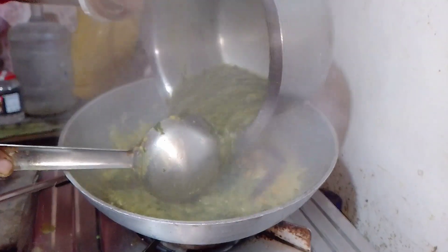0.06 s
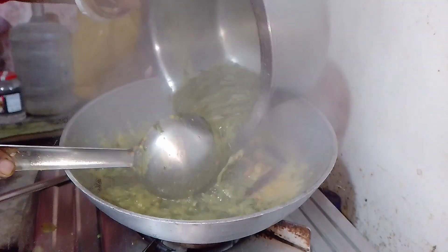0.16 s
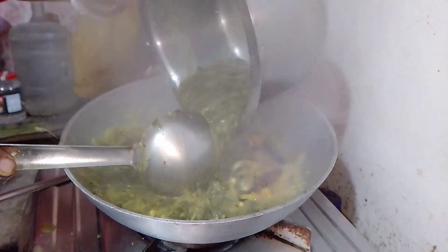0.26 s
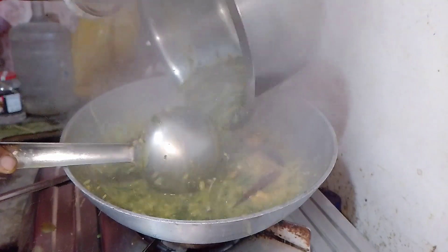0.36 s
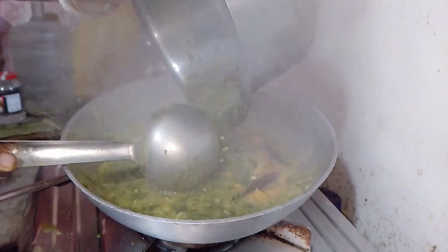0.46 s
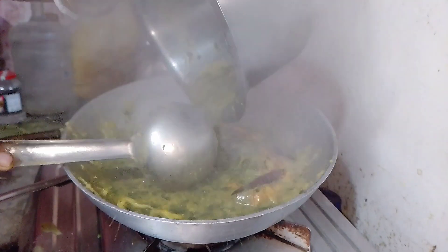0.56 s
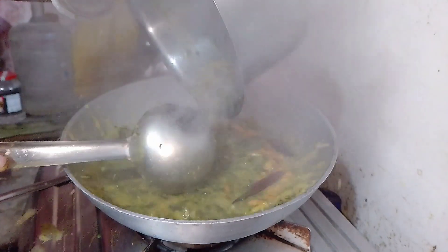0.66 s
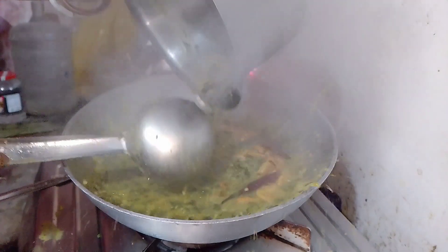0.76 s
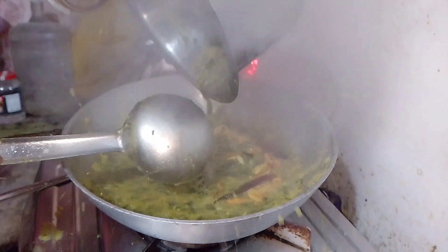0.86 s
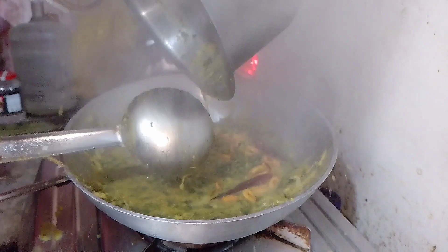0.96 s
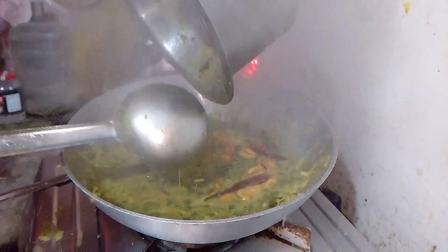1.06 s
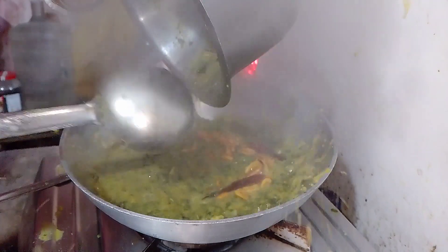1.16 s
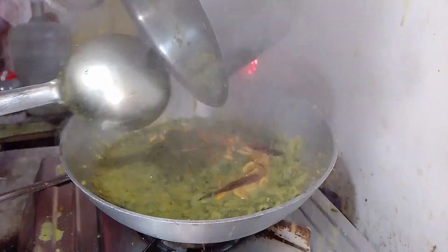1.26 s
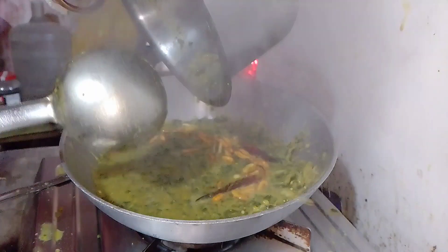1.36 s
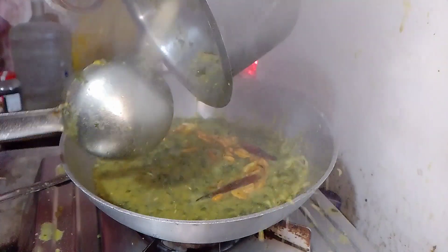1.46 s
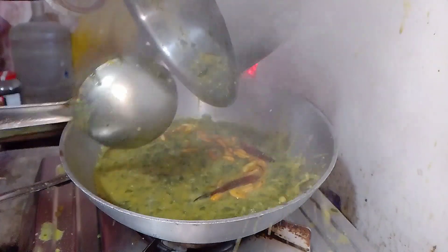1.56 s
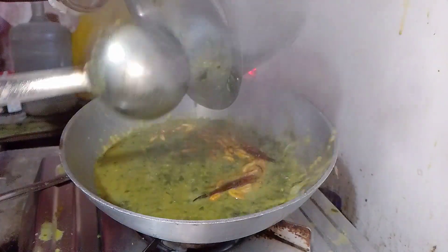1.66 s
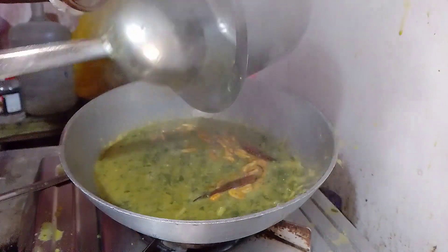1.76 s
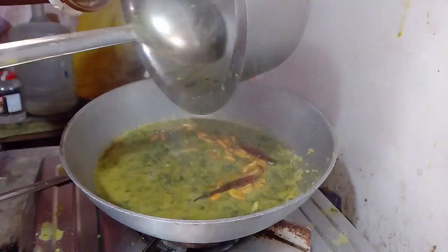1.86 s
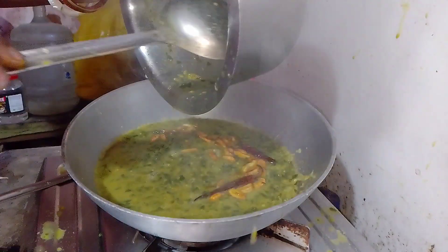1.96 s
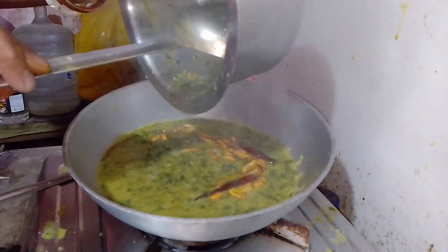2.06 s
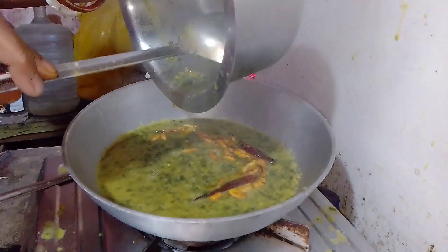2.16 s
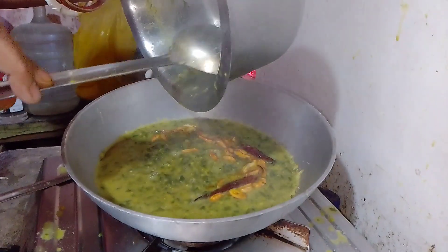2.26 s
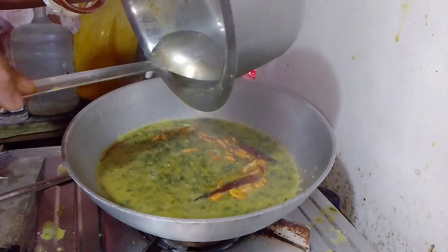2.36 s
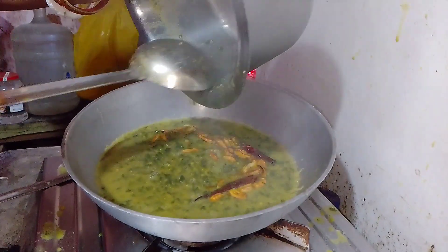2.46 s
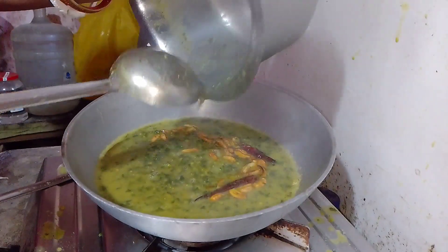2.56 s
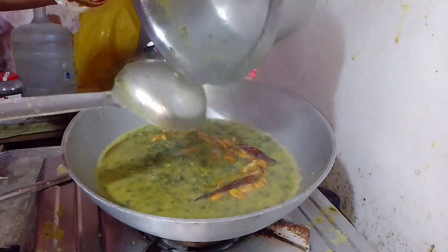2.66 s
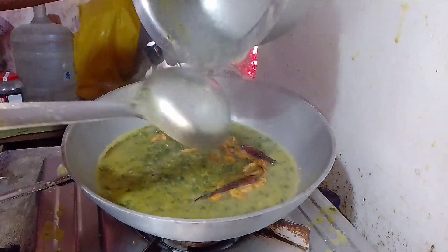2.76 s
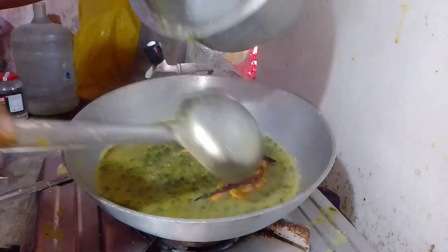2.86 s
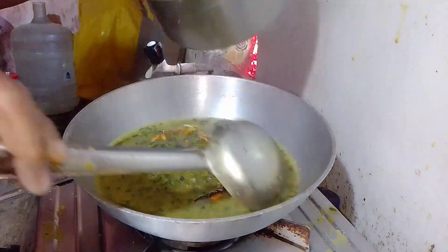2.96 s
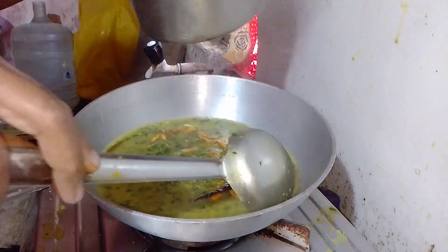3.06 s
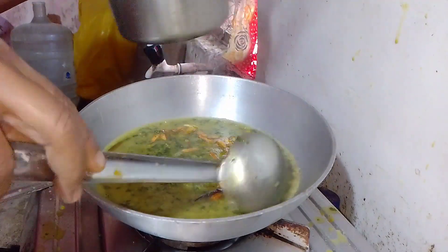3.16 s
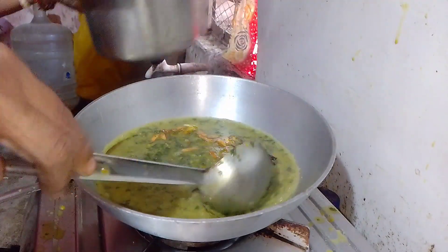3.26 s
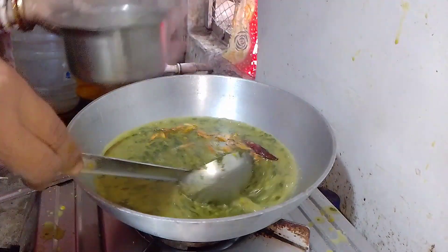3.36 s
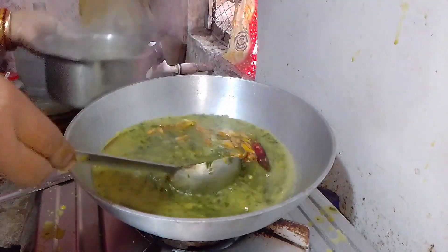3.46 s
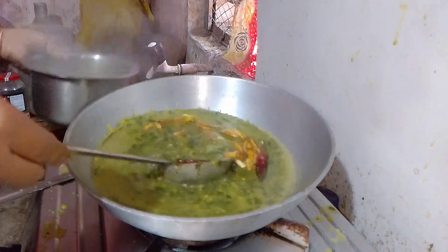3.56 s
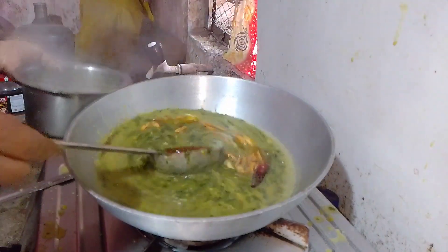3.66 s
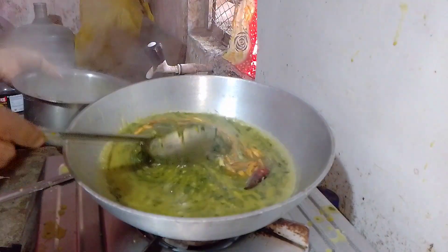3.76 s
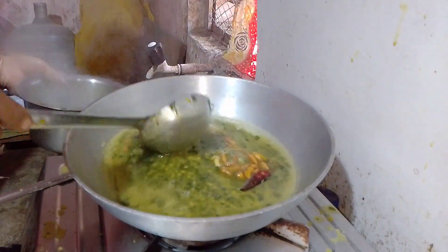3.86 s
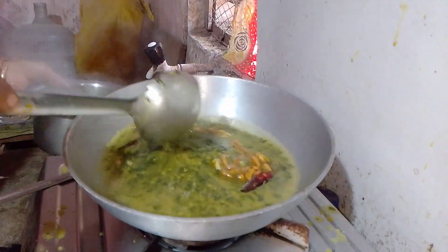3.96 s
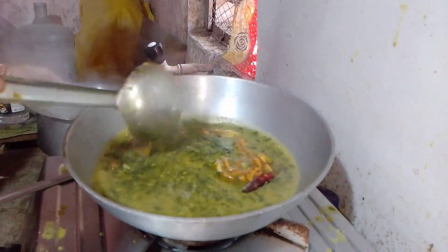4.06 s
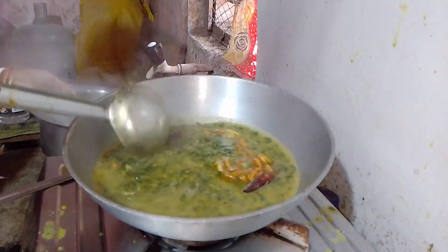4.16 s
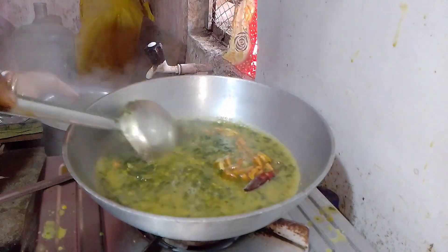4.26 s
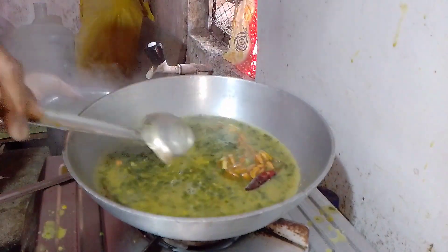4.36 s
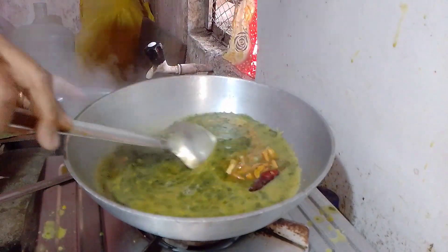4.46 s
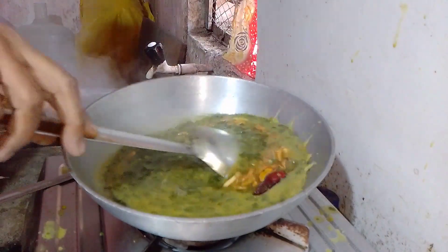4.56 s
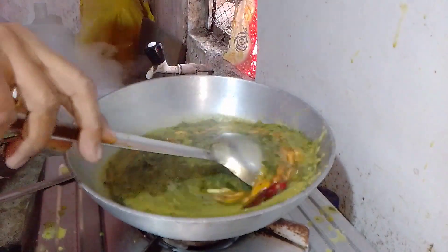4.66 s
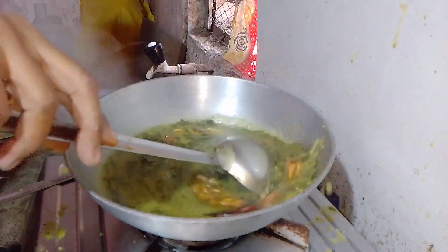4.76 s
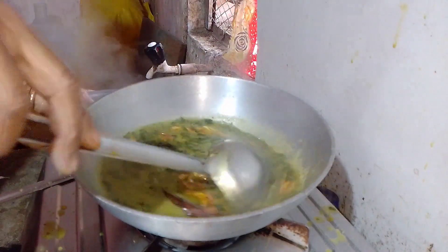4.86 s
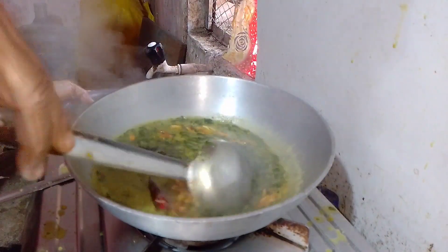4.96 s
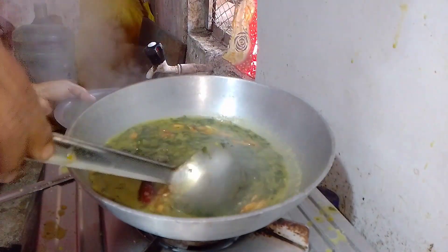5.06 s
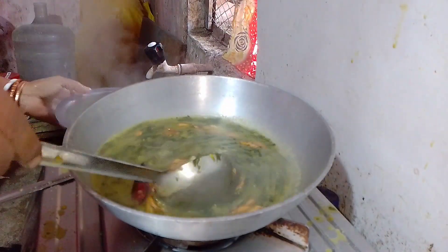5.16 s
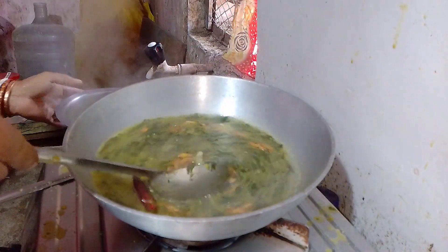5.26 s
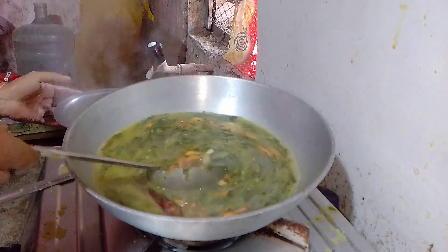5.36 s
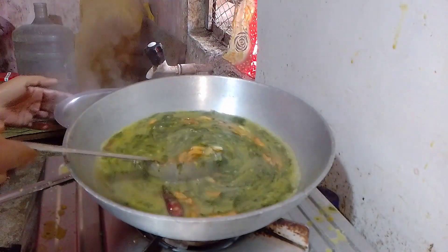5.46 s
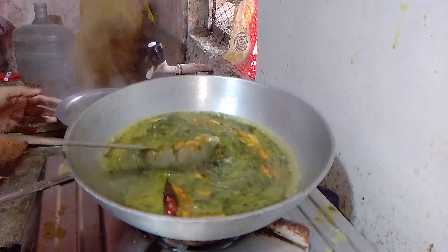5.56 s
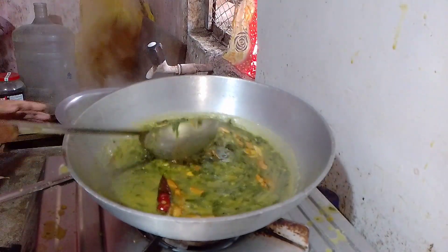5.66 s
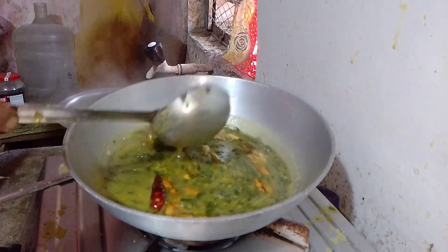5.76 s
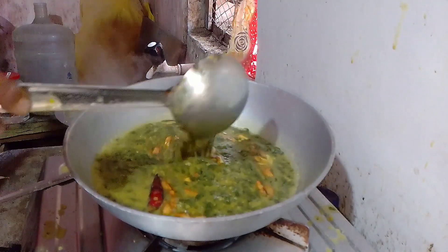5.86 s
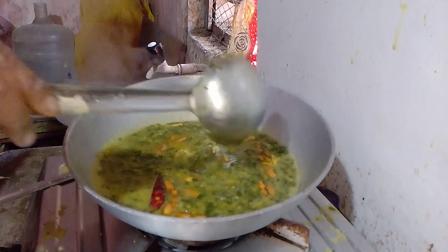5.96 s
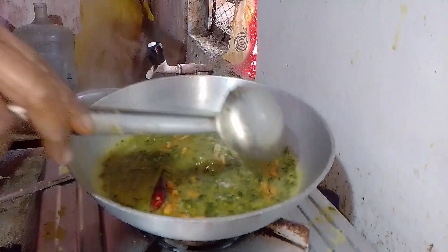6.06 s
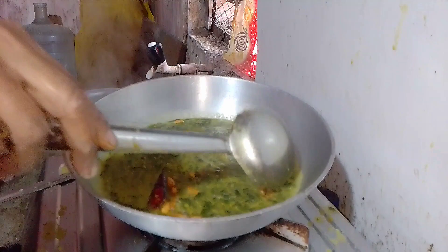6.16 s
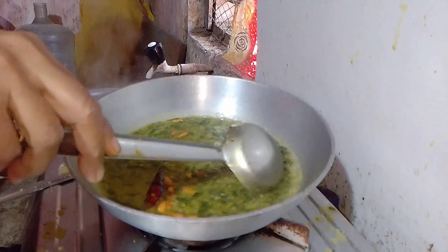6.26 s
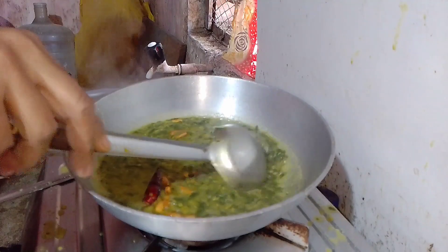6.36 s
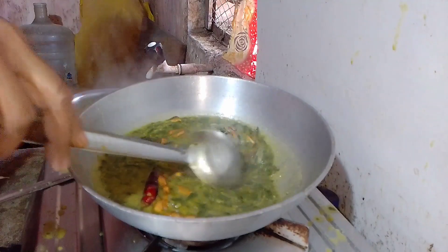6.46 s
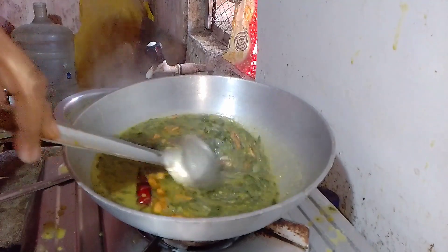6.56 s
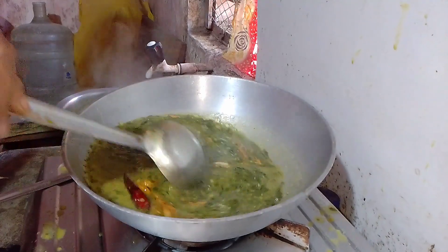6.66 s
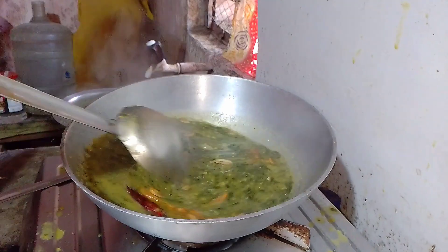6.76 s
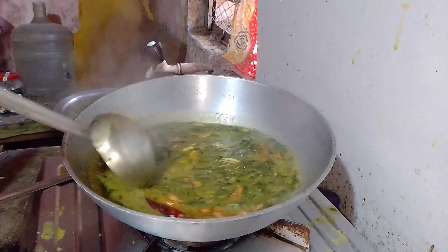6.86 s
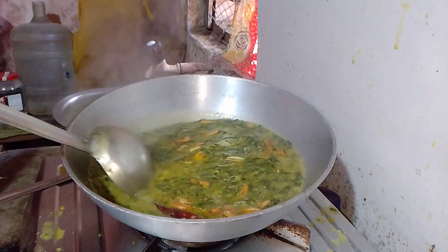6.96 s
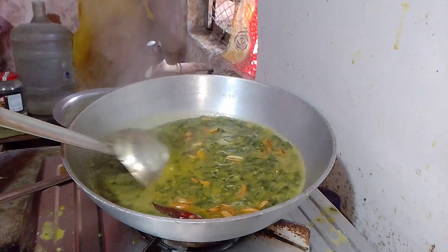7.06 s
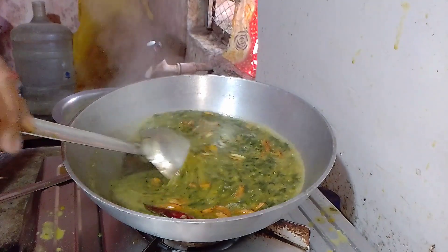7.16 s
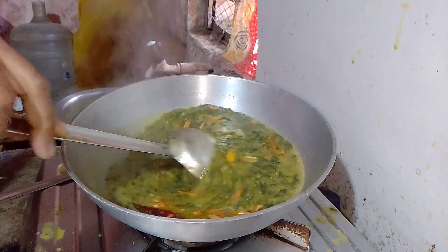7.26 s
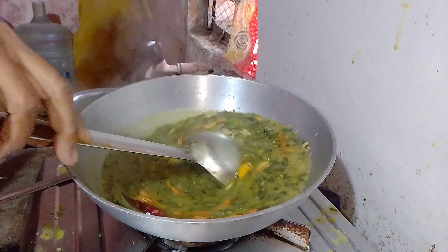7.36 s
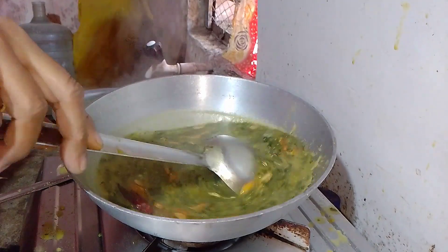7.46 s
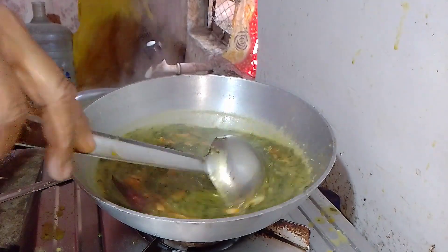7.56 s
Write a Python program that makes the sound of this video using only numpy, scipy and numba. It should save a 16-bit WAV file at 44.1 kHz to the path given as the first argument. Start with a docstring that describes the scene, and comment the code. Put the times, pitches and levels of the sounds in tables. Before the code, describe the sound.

It opens on a loud sizzle and a low sputtering roar as puree lands in hot oil in a metal wok, heard close up in a small kitchen. The roar is gone by about 2 seconds, while the hiss fades steadily to a fine simmer with tiny spattering ticks. A steel ladle rasps briefly near 2.1 seconds, clanks against a pot at 2.4 and scrapes it with a squeal. At 3.1 seconds it strikes the wok with one clear ringing note, then scrapes, groans and sloshes through the thick liquid until about 3.8. A short squeak and several dull knocks come between 4.3 and 5 seconds, with another slosh. The ladle judders against the metal from 5 to 5.5 seconds, and more faintly near 6.3 and 7.3. From about 3.5 seconds to the end, the hiss swells and sinks with each stirring stroke.

```python
"""A small kitchen, one microphone close to a metal wok. Green puree is poured into hot spiced oil:
it lands with a roar, and bursting steam bubbles make a loud sizzle that dies down as the pan cools.
A steel ladle knocks and scrapes the emptied pot, clinks on the wok and stirs, groaning as it sticks
and slips; each stroke washes liquid up the hot wall and the hiss flares again."""
import sys
import numpy as np
from scipy import signal
from scipy.fft import rfft, irfft
from scipy.io import wavfile
from numba import njit

SR = 44100
rng = np.random.default_rng(int(sys.argv[2]) if len(sys.argv) > 2 else 0)


def put_to_file(sound):
    """Save the sound as 16-bit audio at rate SR, in the file named by the first command-line argument."""
    columns = np.atleast_2d(sound).T  # one column per channel
    safe = np.clip(columns, -1, 1)
    whole_steps = np.round(safe * 32767)
    wavfile.write(sys.argv[1], SR, whole_steps.astype(np.int16))


N = 335601
T = np.arange(N) / SR
FREQS = np.arange(N // 2 + 1) * SR / N
POUR_END_S = 0.57

# spectrum of bubbles bursting in hot oil: (frequency [Hz], relative level [dB])
HISS_SPECTRUM = [(700, -36.5), (1000, -19), (1270, -6), (1430, -9), (1750, -3), (2500, -2), (4200, -4),
                 (5200, -12), (6200, -12), (7300, -16.5), (9300, -12), (11000, -21.5), (12800, -28),
                 (15200, -18.5)]


def undb(db):
    """Decibels to gain."""
    return 10 ** (np.asarray(db) / 20)


def together(*levels_db):
    """Level in dB of unrelated sounds heard at once."""
    return 10 * np.log10(sum(undb(db) ** 2 for db in levels_db))


def unit(x):
    """Scale to rms 1."""
    return x / np.sqrt(np.mean(x ** 2) + 1e-20)


def shape(x, gain):
    """Filter by one gain per frequency."""
    return irfft(rfft(x) * gain, N)


def band_unit(x, low_hz, high_hz):
    """Scale so that the given band has rms 1."""
    return x / np.std(shape(x, (FREQS > low_hz) & (FREQS < high_hz)))


def colour(points):
    """Causal response through (frequency [Hz], level [dB]) points."""
    hz, db = np.transpose(points)
    curve_db = np.interp(np.log(FREQS + 1), np.log(hz), db)
    cepstrum = irfft(np.log(undb(curve_db)), N)
    cepstrum[1:N // 2] *= 2
    cepstrum[N // 2:] = 0
    return np.exp(rfft(cepstrum))


def resonance(hz, width_hz):
    """Response of one resonance, gain 1 at its centre."""
    return 1j * FREQS * width_hz / (hz ** 2 - FREQS ** 2 + 1j * FREQS * width_hz)


@njit
def moving_band(x, hz, q):
    """State-variable band-pass whose centre moves; gain 1 at the centre."""
    y, band, low = np.empty(len(x)), 0., 0.
    for i in range(len(x)):
        g = np.tan(np.pi * hz[i] / SR)
        v = (band + g * (x[i] - low)) / (1 + g * (g + 1 / q))
        band, low = 2 * v - band, low + 2 * g * v
        y[i] = v / q
    return y


def wander(per_s):
    """Smooth random drift of rms 1."""
    return unit(np.interp(T * per_s, np.arange(4096), rng.standard_normal(4096)))


def pops(per_s, scatter_db):
    """Random clicks; scatter makes a few of them larger than the rest."""
    happens = rng.random(N) < per_s / SR
    size = undb(scatter_db * np.minimum(rng.exponential(size=N), 6))
    return unit(happens * size * np.sign(rng.standard_normal(N)))


def stroke(start, end, edge_s):
    """Pressure of one movement: rises, holds, lets go."""
    inside_s = np.minimum(T - start, end - T)
    return np.sin(np.pi / 2 * np.clip(inside_s / edge_s + .5, 0, 1)) ** 2


def fade(t60_s):
    """Exponential decay by 60 dB in t60_s."""
    return np.exp(-np.minimum(np.log(1000) * T / t60_s, 60))


def ring(modes):
    """Impulse response of a metal body; neighbouring modes swing in opposite directions."""
    t = T[:2 * SR]
    return sum((-1) ** k * undb(db - 60 * t / t60) * np.cos(2 * np.pi * hz * t)
               for k, (hz, db, t60) in enumerate(modes))


def play(hits, sound):
    """Start a fresh sound at each (time [s], gain [dB])."""
    out = np.zeros(N)
    for time_s, db in hits:
        start = int(time_s * SR)
        part = sound()[:N - start]
        out[start:start + len(part)] += undb(db) * part
    return out


def kitchen(direct, t60_s, wet_db):
    """Close walls send a short, slightly dull tail back to the microphone."""
    reflections = rng.standard_normal(N) * fade(t60_s) * (T > .003)
    tail = shape(reflections, resonance(1800, 8700))
    tail = tail[:SR] / np.sqrt(np.sum(tail ** 2))
    room = signal.fftconvolve(direct, tail)[:N]
    return (direct + undb(wet_db) * room) / np.sqrt(1 + undb(wet_db) ** 2)


def sloshing():
    """The bowl of the ladle rumbles through the thick puree."""
    # pushes through the liquid: (start [s], end [s], level [dB])
    sweeps = [(3.118, 3.38, -41.5), (3.43, 3.78, -51.5), (4.63, 4.93, -42.5), (6.393, 6.87, -57.5),
              (7.378, 7.61, -54.5)]
    # spectrum of the stirred liquid: (frequency [Hz], relative level [dB])
    slosh_spectrum = [(40, -43), (80, -14), (115, -4), (165, -11), (230, -14), (320, 4.5), (600, 1),
                      (900, -4.5), (1300, -1.5), (2500, -35), (6000, -36)]
    slosh = unit(shape(pops(1300, scatter_db=2.5), colour(slosh_spectrum)))
    push = sum(undb(db) * stroke(start, end, edge_s=0.031) for start, end, db in sweeps)
    return push * slosh


def juddering():
    """The ladle sticks and slips, making a low mode of the metal groan; each catch swells it."""
    # drags: (start [s], end [s], opening level [dB], pitch [Hz], roughness [0-1], catch rate [1/s])
    judders = [(2.076, 2.17, -43.5, 540, .8, 12), (2.59, 2.682, -42, 535, 0.05, 15),
               (3.135, 3.38, -54, 229, 0.6, 19), (3.225, 3.408, -37.5, 305, 0.25, 23),
               (3.434, 3.626, -38, 315, 0.5, 19), (5.016, 5.25, -40.5, 310, 0.42, 29),
               (5.269, 5.351, -41.5, 314, 0.35, 27), (5.35, 5.47, -49.5, 313.5, 0.7, 19),
               (6.205, 6.395, -51.5, 507, 0.76, 15.6), (7.224, 7.398, -47, 570, 0.6, 19)]
    catch_db, sag_db_per_s = 4.5, 23  # the pressure eases after the ladle bites
    out = np.zeros(N)
    drift = 1 + 0.0269 * wander(90)
    chatter = undb(1.7 * wander(120))
    slips = pops(1500, scatter_db=1.5)
    for start, end, db, hz, rough, catch_per_s in judders:
        since_s = np.maximum(T - start, 0)
        catches = undb(-catch_db * np.cos(2 * np.pi * catch_per_s * since_s))
        groan = unit(chatter * catches * np.sin(2 * np.pi * np.cumsum(hz * drift) / SR))
        # under light pressure the slips lose step with the mode
        rasp = unit(shape(slips, resonance(hz, 0.33 * hz) ** 2))
        pressure = stroke(start, end, edge_s=0.029) * undb(-sag_db_per_s * since_s)
        out += undb(db) * pressure * (np.sqrt(1 - rough) * groan + np.sqrt(rough) * rasp)
    return out


def scraping():
    """Tiny slips of steel on metal ring the ladle and excite a squeal pitched by the point of contact; one
    narrow slide near 2.9 kHz instead sets a mode of the wok ringing again."""
    # slides: (start [s], end [s], squeal [dB], centre [Hz], resonance half-width [Hz], ladle ring [dB])
    scrapes = [(2.47, 2.574, -32.5, 2560, 330, -38), (2.508, 2.647, -37, 3980, 270, -40.5),
               (3.137, 3.21, -33.5, 2500, 560, -45), (3.204, 3.27, -32.5, 2220, 350, -39),
               (3.27, 3.394, -33, 1840, 180, -40.5), (3.248, 3.394, -40, 2907, 30, -56),
               (4.354, 4.371, -28, 2940, 600, -51), (5.025, 5.193, -45.5, 1720, 400, -53)]
    # thin steel of the ladle: (frequency [Hz], width [Hz], relative level [dB])
    ladle_modes = [(3786, 30, 6), (4190, 100, 0.5), (4860, 45, 2), (5150, 47, 5), (5700, 79, -1),
                   (6100, 63, 1), (6350, 90, -1), (8130, 200, -3.5), (8800, 250, -21), (8750, 140, -13),
                   (9920, 69, -13)]
    out = np.zeros(N)
    slips = pops(3000, scatter_db=0) * undb(wander(120))
    ladle = sum(undb(db) * resonance(hz, width_hz) for hz, width_hz, db in ladle_modes)
    steel = unit(shape(slips, ladle))
    for start, end, squeal_db, hz, half_width_hz, steel_db in scrapes:
        squeal = unit(shape(slips, resonance(hz, 2 * half_width_hz) ** 2))
        out += stroke(start, end, edge_s=0.067) * (undb(squeal_db) * squeal + undb(steel_db) * steel)
    return out


def wok_knocks():
    """The ladle meets the full wok: a sharp tick, a damped thud and one clear ringing note."""
    # blows, their ring choked when under the liquid: (time [s], thud gain [dB], ring gain [dB])
    blows = [(3.102, -2.5, 0.5), (4.347, -10, -27), (4.422, -19, -40), (4.71, -16, -34), (4.745, -9, -32),
             (4.78, -10, -30), (4.835, -13, -28), (4.936, -12, -25)]
    # ladle on wok; the clear note is a beating pair: (frequency [Hz], relative level [dB], t60 [s])
    wok_modes = [(230.5, -13, 1), (300, -9, 0.88), (460, -7, 0.65), (697, -6, .13), (1266, -15, 0.52),
                 (1587, -10.5, 0.35), (2970, 5.5, 0.99), (2974, -1, 0.2), (4210, -28, .9), (4700, -6, 0.13),
                 (5620, -8, .11), (6800, -11, .1), (8190, -19, .13), (9150, -2, .08)]
    # spectrum of the thud: (frequency [Hz], relative level [dB])
    thud_spectrum = [(50, -16), (150, -41), (240, 3.5), (450, -3.5), (620, 4), (900, -15), (1800, -10),
                     (3000, -11), (4200, -20), (5600, -15), (9000, -34), (15000, -39)]
    times, thud_db, ring_db = np.transpose(blows)
    tick_and_thud = fade(t60_s=0.0067) + undb(-6) * fade(t60_s=0.16)
    thuds = play(zip(times, thud_db), lambda: rng.standard_normal(N) * tick_and_thud)
    ringing = play(zip(times, ring_db), lambda: ring(wok_modes))
    return undb(-3) * shape(thuds, colour(thud_spectrum)) + undb(-28) * ringing


def pot_knocks():
    """The ladle hits the hand-held pot and chatters: a dense clank and a short ring."""
    # blows on the pot: (time [s], gain [dB])
    blows = [(2.4025, 1.5), (2.405, -1.5), (2.4155, 0), (2.424, -7.5), (2.476, -16)]
    # ringing of the emptied pot: (frequency [Hz], relative level [dB], t60 [s])
    pot_modes = [(575, -13, 0.16), (666, -9.5, 0.29), (913, -7.5, 0.096), (1370, -9.5, 0.15),
                 (1515, -3, 0.17), (1906, -10, 0.2), (2085, -12, 0.13), (2250, 1, 0.11), (2418, -9, 0.17),
                 (3770, -15, 0.16), (4320, -17, 0.4), (4450, -16, .12), (4760, -14, .17),
                 (4870, -10.5, 0.16), (5240, -5.5, 0.12), (5756, -9.5, 0.39), (6008, -32, .8),
                 (8900, -25, 0.94), (9500, -23, .15)]
    # spectrum of the clank: (frequency [Hz], relative level [dB])
    clank_spectrum = [(100, -31), (300, -17.5), (480, 2.5), (620, 14.5), (780, -15), (1100, -4), (1450, -1),
                      (2300, -6), (3000, -12), (3600, -5.5), (5500, -4), (6600, -18), (10000, -18),
                      (15000, -52)]

    def struck_spot():
        """Each blow lands on another spot, which shifts the balance of the modes."""
        return ring([(hz + 6 * rng.standard_normal(), db + rng.standard_normal(), t60)
                     for hz, db, t60 in pot_modes])

    clanks = play(blows, lambda: rng.standard_normal(N) * fade(t60_s=0.1))
    ringing = play(blows, struck_spot)
    return undb(-8.5) * shape(clanks, colour(clank_spectrum)) + undb(-20) * ringing


def flash_level():
    """Hiss of the flashing oil in dB: it holds while the stream runs, then falls steadily."""
    held_db, fall_db_per_s = -24, 8
    return held_db - fall_db_per_s * np.maximum(T - POUR_END_S, 0)


def pour():
    """The stream lands in the oil and sputters with a low roar; steam escapes with a thin hiss."""
    # spectrum of the landing puree: (frequency [Hz], relative level [dB])
    roar_spectrum = [(20, -16), (70, -10), (165, -11.5), (205, -7), (255, -5.5), (310, 1), (480, -3),
                     (850, -3.5), (1200, 0), (1900, -4), (3500, -8.5), (7000, -29.5)]
    roar = unit(shape(pops(7000, scatter_db=3), colour(roar_spectrum)))
    steam = unit(shape(rng.standard_normal(N), resonance(11500, width_hz=5500) ** 2))
    fall_db = 10 * (T / 1.36) ** 2.5  # 10 dB down at 1.36 s, dying ever faster
    roar_db = -23.5 - fall_db + 0.32 * wander(22.6)
    return roar * undb(roar_db) + steam * undb(flash_level() - 20)


def wash_levels():
    """Hiss and fizz in dB as each stroke washes liquid up the hot wall."""
    # flares: (crest [s], rise [s], fall [s], hiss [dB], fizz re hiss [dB])
    washes = [(3.7, .25, 0.19, -34, -6.5), (4.19, .15, 0.2, -40, -9), (4.73, 0.27, 0.29, -34.5, -9.5),
              (5.14, .11, 0.2, -39.5, -8.3), (5.561, 0.37, 0.16, -40.5, -7.5), (5.89, 0.035, .06, -54, -6),
              (6.08, 0.23, 0.26, -43.5, -10.5), (6.789, 0.16, 0.19, -37.5, -9.5),
              (7.1, 0.14, 0.13, -42, -10), (7.49, 0.29, 0.33, -37, -8.5)]
    flatness = 2.1  # 2 is a bell; higher holds the crest longer
    hiss_power = fizz_power = 1e-20
    for crest, rise_s, fall_s, hiss_db, fizz_db in washes:
        from_crest = np.abs(T - crest) / np.where(T < crest, rise_s, fall_s)
        power = (undb(hiss_db) * np.exp(-from_crest ** flatness)) ** 2
        hiss_power += power
        fizz_power += power * undb(fizz_db) ** 2
    return 10 * np.log10([hiss_power, fizz_power])


def frying_levels():
    """Hiss, fizz and boiling in dB: the flash, the slowly cooling simmer and the washes add up."""
    flash_db = flash_level()
    finer_db = 3.22 * np.maximum(T - POUR_END_S, 0)  # bubbles get finer as the flash dies down
    simmer_db, simmer_boil_db = -27.5 - 2.5 * T, -40 - 1.92 * T
    wash_db, wash_fizz_db = wash_levels()
    hiss_db = together(flash_db, simmer_db, wash_db)
    fizz_db = together(flash_db - 9 + finer_db, simmer_db - 18.5, wash_fizz_db)
    boil_db = together(flash_db - 12, simmer_boil_db, wash_db - 14.5)
    return hiss_db, fizz_db, boil_db


def wok_bowl():
    """The curved pan over the liquid tints the sizzle at a few frequencies."""
    # broad resonances of the bowl: (frequency [Hz], width [Hz], lift [dB])
    lifts = [(1250, 78, -1), (1664, 44, 1), (2300, 190, 2), (2680, 54, 3), (3430, 230, 2.5), (4110, 190, 2),
             (4720, 240, 3), (5310, 120, 4), (5880, 230, 3.5), (7400, 180, 1), (8400, 250, 1.5)]
    return np.prod([1 + (undb(db) - 1) * resonance(hz, width_hz) for hz, width_hz, db in lifts], axis=0)


def under_ladle(hiss):
    """The air pocket under the ladle colours the hiss with a resonance that glides as it moves."""
    # low passes over the surface: (start [s], end [s], first [Hz], last [Hz], level re hiss [dB])
    glides = [(2.853, 3.083, 2350, 3150, -12), (3.93, 4.3, 2740, 1980, -9), (4.54, 4.8, 4200, 3200, -9),
              (4.825, 5.117, 2500, 1660, 0), (5.64, 5.87, 1900, 1000, -2), (6.08, 6.56, 2850, 1200, -2.5),
              (6.913, 7.26, 1500, 2100, -5)]
    pocket_q = 5.7
    out = hiss.copy()
    for start, end, first_hz, last_hz, db in glides:
        pocket = moving_band(hiss, np.interp(T, [start, end], [first_hz, last_hz]), pocket_q)
        out += undb(db) * stroke(start, end, edge_s=0.11) * pocket
    return out


def spatter(hiss_db):
    """Larger droplets burst in the oil with dry ticks."""
    ticks = shape(pops(90, scatter_db=1), colour(HISS_SPECTRUM) * resonance(4400, 14000))
    return unit(ticks) * undb(hiss_db - 15)


def sizzle():
    """Steam bubbles burst by the thousand: coarse ones boil in the liquid, fine ones fizz on the wall."""
    # spectrum of the coarse bubbles: (frequency [Hz], relative level [dB])
    boil_spectrum = [(40, -33), (80, -21), (115, -12.5), (165, -29.5), (220, -11.5), (310, -4), (410, 0),
                     (470, 2), (530, 0), (620, 3), (740, -3.5), (860, -10.5), (1200, -7), (1700, -35)]
    hiss_db, fizz_db, boil_db = frying_levels()
    bubbles_per_s = 9000 * undb(0.52 * (hiss_db + 36.5))  # a fiercer sizzle is denser, so smoother
    spectrum = colour(HISS_SPECTRUM) * wok_bowl()
    fizz_share = 1 / (1 + (4700 / (FREQS + 1)) ** 4)  # crossover at 4700 Hz
    hiss = shape(pops(bubbles_per_s, scatter_db=0.5), spectrum * np.sqrt(1 - fizz_share))
    fizz = shape(pops(1.6 * bubbles_per_s, scatter_db=1.5), spectrum * np.sqrt(fizz_share))
    boil = shape(pops(0.4 * bubbles_per_s, scatter_db=1.84), colour(boil_spectrum))
    hiss = undb(hiss_db - 1.7) * under_ladle(band_unit(hiss, 2000, 4500))
    fizz = undb(fizz_db - 0.53) * band_unit(fizz, 6000, 15000)
    boil = undb(boil_db + 1.2 * wander(25)) * band_unit(boil, 420, 800)
    flicker = undb(0.33 * wander(35))
    return (hiss + fizz + boil) * flicker + spatter(hiss_db)


def scene():
    """One microphone close to the wok, alike on both channels; the judder and slosh stay dry."""
    stove = sizzle() + pour() + pot_knocks() + wok_knocks() + scraping()
    mono = kitchen(stove, t60_s=0.42, wet_db=-14) + juddering() + sloshing()
    return np.array([mono, mono])


def record(dry):
    """The recorder cuts the top steeply above 15750 Hz."""
    return signal.sosfilt(signal.ellip(12, .1, 80, 15750, fs=SR, output="sos"), dry)


dry = scene()
out = record(dry)
put_to_file(out)
```